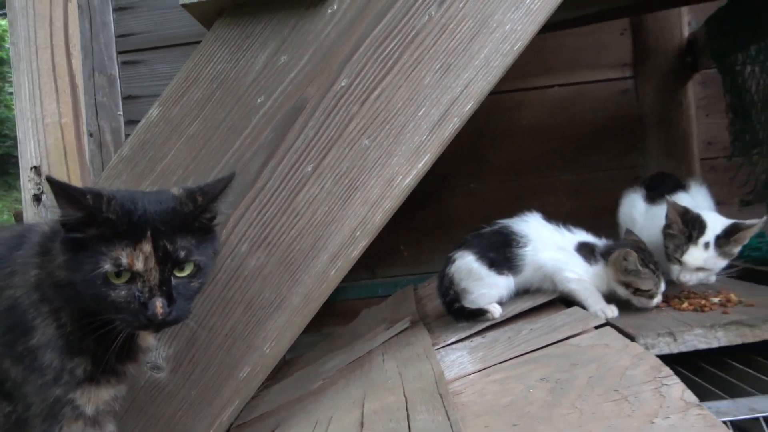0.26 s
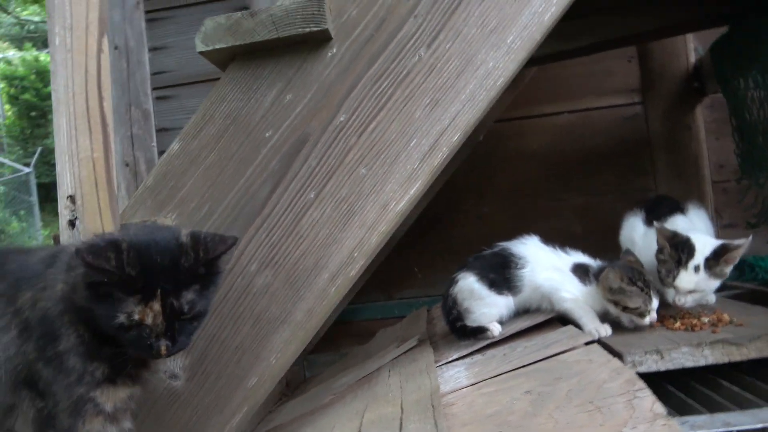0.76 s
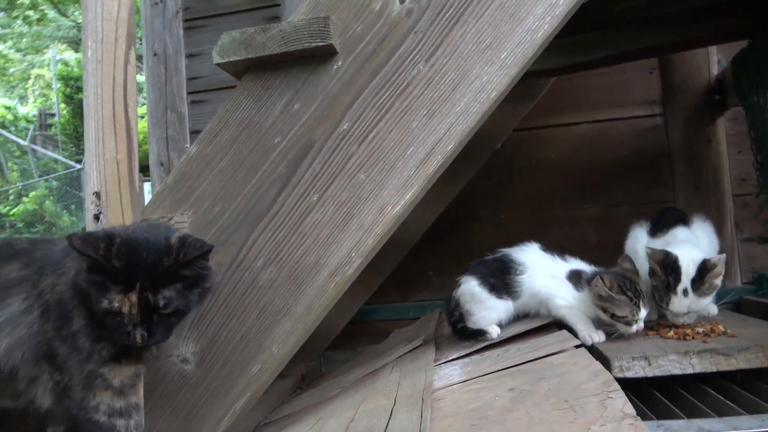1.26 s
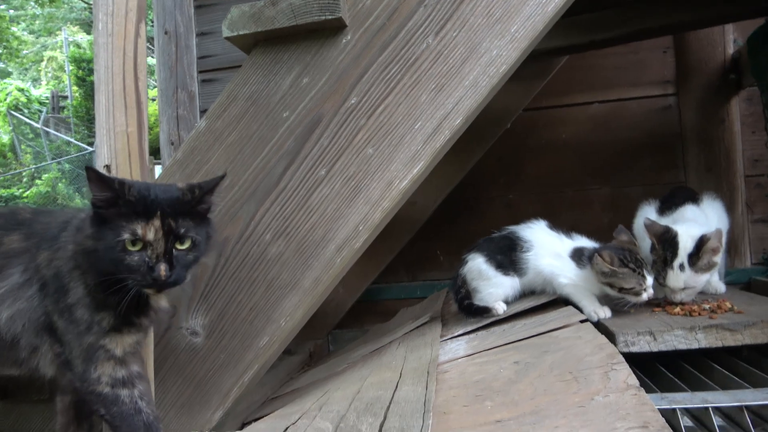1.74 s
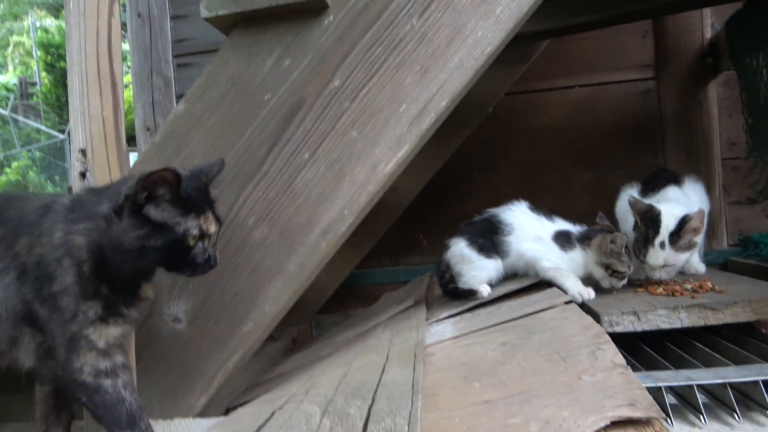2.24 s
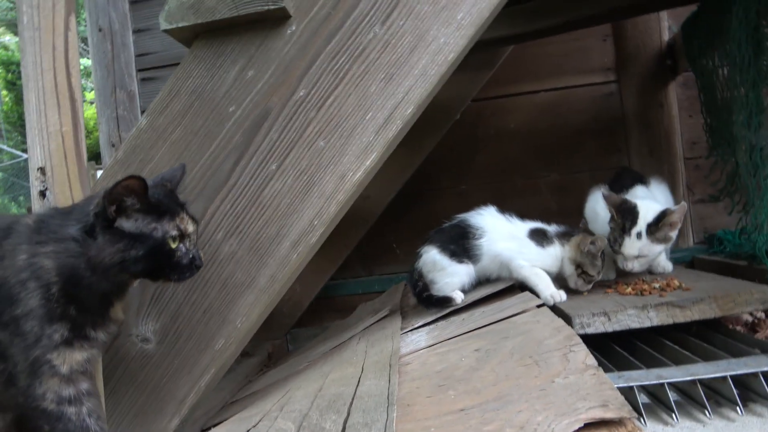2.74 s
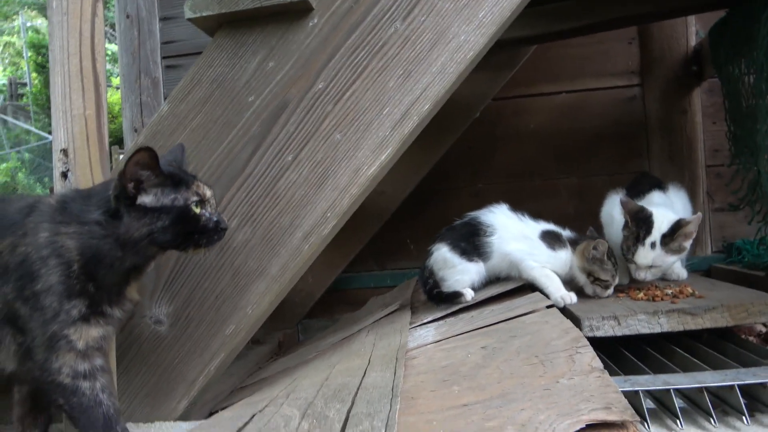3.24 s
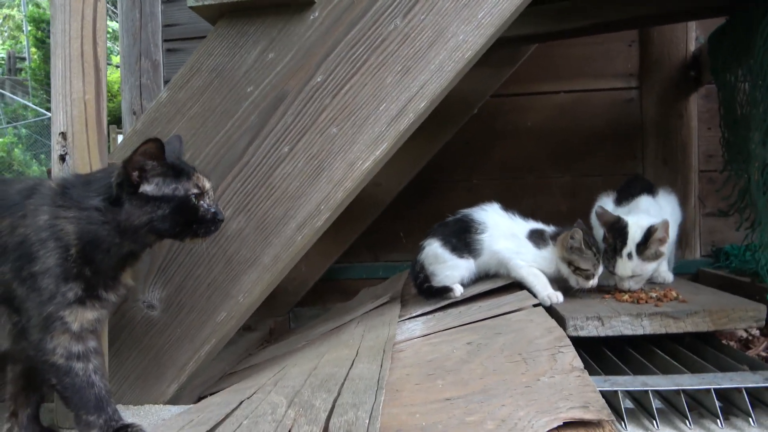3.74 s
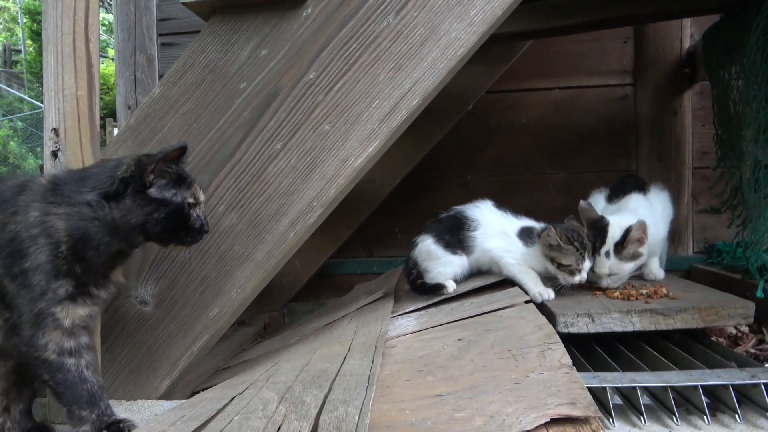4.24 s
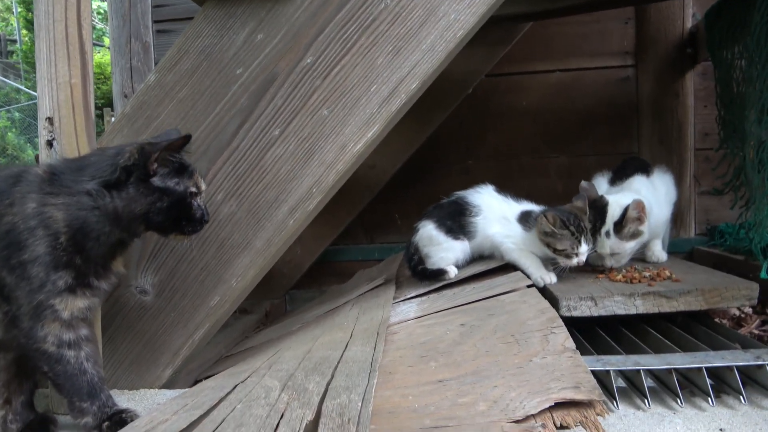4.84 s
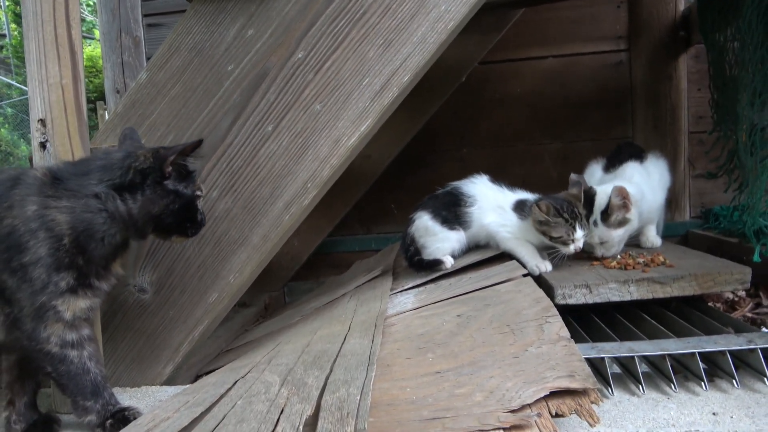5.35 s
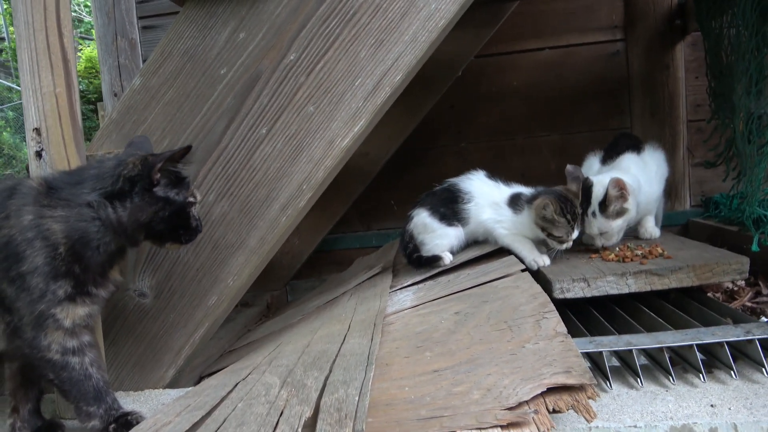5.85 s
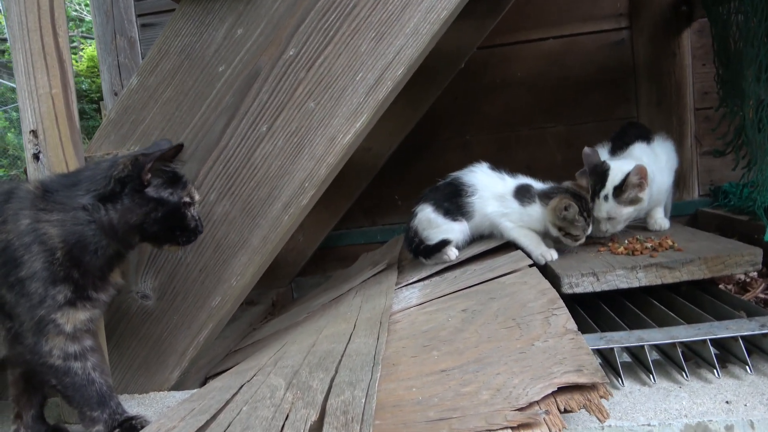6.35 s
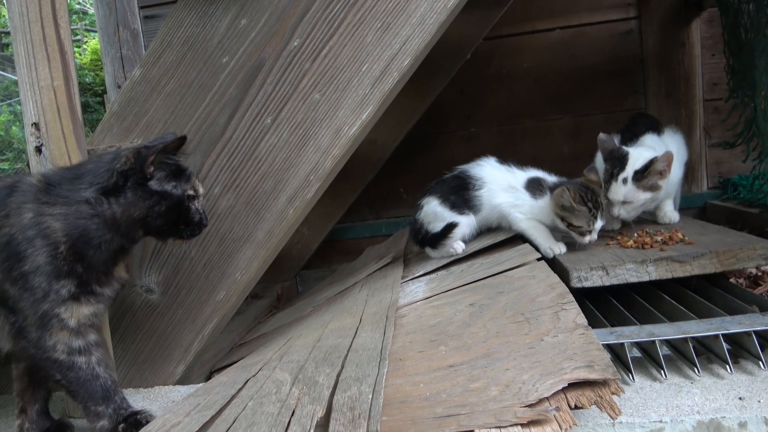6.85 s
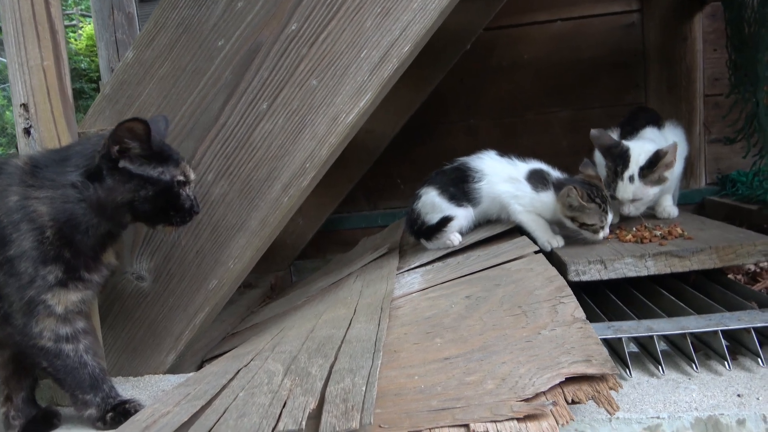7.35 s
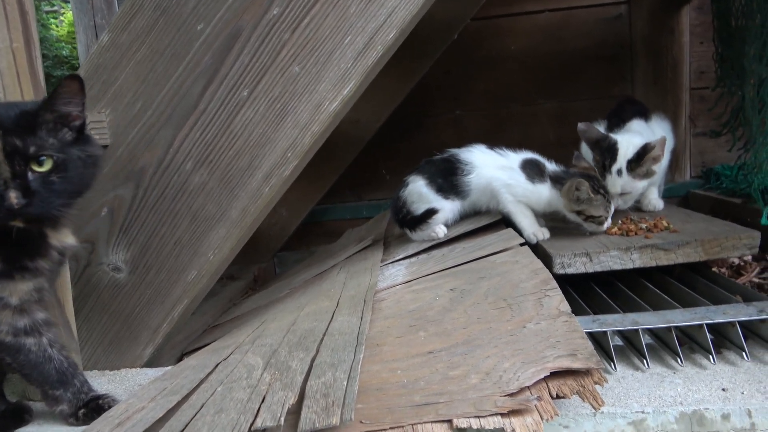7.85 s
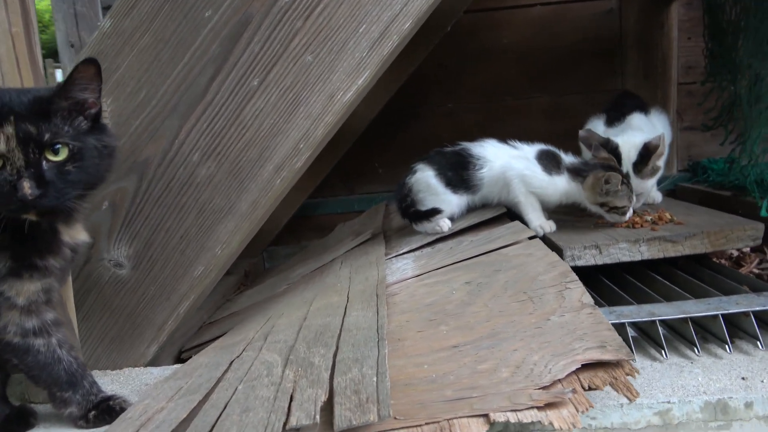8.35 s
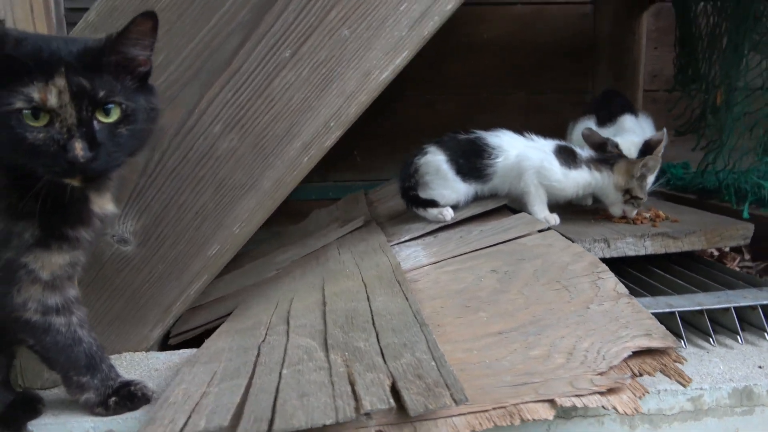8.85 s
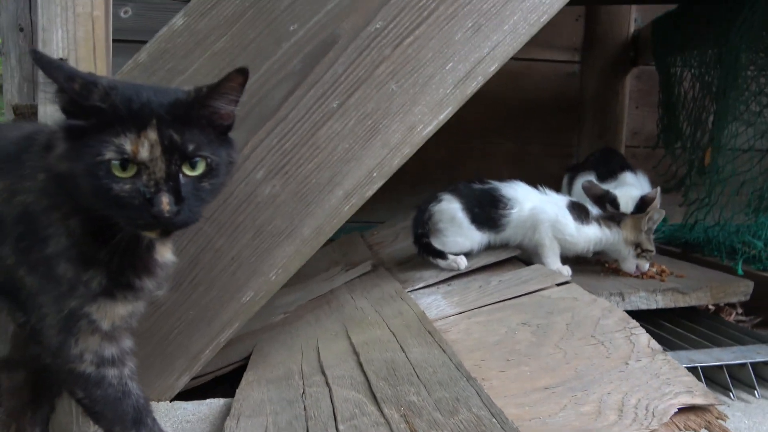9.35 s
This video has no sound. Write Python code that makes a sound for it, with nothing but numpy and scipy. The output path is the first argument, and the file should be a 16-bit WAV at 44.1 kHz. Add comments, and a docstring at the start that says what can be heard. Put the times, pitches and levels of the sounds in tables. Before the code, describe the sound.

Loud, shrill summer cicadas pulse rapidly over a steady distant insect chorus while cats crunch dry food on wooden boards, with occasional soft paw thumps.

```python
"""Summer cicadas around a wooden shelter

Close by, a singer's pitch swings up and down about fourteen times a second; a neighbour half a swing out of
step at times fills its gaps, and a buzzer holds one note: buckling tymbals ring damped modes. Far off, a chorus
of echoed click trains and shaped noise shimmers. Dry food cracks on the boards and rings their modes, paws
thump in low pushes, and a hum and low airy noise lie below. A band-limited stereo microphone hears it all."""
import sys
import numpy as np
from scipy import signal
from scipy.fft import rfft, irfft, next_fast_len
from scipy.io import wavfile
from scipy.ndimage import uniform_filter1d, map_coordinates

SR = 44100
rng = np.random.default_rng(int(sys.argv[2]) if len(sys.argv) > 2 else 0)


def unload_audio(sound):
    """Save the sound as a 16-bit wav file, at the path given as the first command line argument."""
    columns = np.transpose(np.atleast_2d(sound))
    # keep every value between -1 and 1, then stretch to whole-number steps
    steps = np.round(np.clip(columns, -1, 1) * 32767)
    wavfile.write(sys.argv[1], SR, steps.astype(np.int16))


def natural_amplitude(level_db):
    """Convert a level in decibels to a linear amplitude factor, elementwise."""
    exponent = np.asarray(level_db, float) / 20
    return 10 ** exponent


N = 423360  # samples, 9.6 s

# Near singer's pace, held until the next row: [t/s, abdomen swings per s]
SWING_PACE = [(0, 13.91), (1, 13.71), (2.5, 13.82), (5.3, 13.97), (6.9, 14.45), (7.3, 13.85), (7.7, 13.58),
              (9.25, 15)]
# Effort of the near singer: [t/s, low notes 0-1, high notes 0-1]
SINGER_EFFORT = [(0, .72, .75), (1.4, .72, .62), (3.7, .8, .62), (5.2, .62, .52), (7.1, .55, .45),
                 (7.3, .9, .4), (7.8, .88, .6), (9, .78, .72), (9.3, .6, .55)]
# Effort of the neighbour: [t/s, low notes 0-1, high notes 0-1]
NEIGHBOUR_EFFORT = [(0, .1, .1), (4.6, .15, .15), (5.4, .45, .25), (7.15, .48, .4), (7.3, 0, .2),
                    (9.1, .1, 0), (9.3, .52, .3)]
# Modes that ring while the abdomen is low: [f/Hz, level/dB, t60/s]
LOW_MODES = [(5140, -15.5, 0.0097), (5413, -12.5, 0.011), (5920, -15, 0.0087), (6212, -16.5, 0.01)]
# Modes that glide with the abdomen: [low f/Hz, high f/Hz, low level/dB, high level/dB, t60/s]
GLIDING_MODES = [(5836, 8100, -12.5, -15, 0.0068), (6495, 8700, -14, -19, 0.0075),
                 (11310, 15200, -10, -8.5, 0.0048), (12120, 15770, -11.5, -1.5, 0.0054)]
# Modes of the steady buzzer: [f/Hz, level/dB, t60/s]
BUZZER_MODES = [(4946, -28, 0.0078), (7050, -24, 0.0045), (8690, -27.5, 0.0069)]
# What small bodies radiate, with no bass: [f/Hz, level/dB]
BODY_RADIATION = [(3000, -60), (3700, -3), (4600, 3.5), (8700, 2.5), (9800, 3.5), (11200, -2.5)]
# Decay of the scattered echo around the shelter: [f/Hz, t60/s]
YARD_DECAY = [(500, 0.19), (5000, 0.076), (15000, 0.19)]
# The clearest far singers: [buckles per s]
FAR_BUCKLE_RATES = [163, 187, 204]
# Level of the far chorus: [t/s, body level/dB, fizz level/dB]
CHORUS_LEVELS = [(0, -23, -24.5), (5, -25, -26), (6.5, -25.5, -27.5), (7.2, -24.5, -26.5),
                 (9.6, -25.5, -27)]
# Spectral shape of the chorus's lower band: [f/Hz, level/dB per Hz]
BODY_SPECTRUM = [(2060, -51), (3500, -38), (3840, -37), (4230, -13.5), (4990, -3), (6100, 0.5),
                 (8230, -4.5), (9620, -24), (10500, -23), (13600, -19), (22000, -120)]
# Spectral shape of the chorus's upper band: [f/Hz, level/dB per Hz]
FIZZ_SPECTRUM = [(5600, -50), (9300, -16), (10000, -11), (11400, -1), (12400, 0), (13400, -1), (15900, 0)]
# Spectral shape below the chorus: [f/Hz, level/dB per Hz]
UNDERTONE_SPECTRUM = [(1120, -45), (1900, -15), (2270, -7), (2470, 0), (2690, -1), (2940, -1), (3000, -5),
                      (3140, -6), (3180, -9), (3350, -10), (3800, -6), (4940, -36), (8360, -120)]
# Likeness of left and right in the far sounds: [f/Hz, correlation]
STEREO_LIKENESS = [(60, 0.41), (130, 0.39), (290, 0.29), (640, 0.49), (1410, 0.67), (3100, 0.91),
                   (6820, 0.68), (15000, 0.77)]
# A far machine, mean pitch and typical rms: [f/Hz, level/dB]
FAR_MACHINE = (99, -67)
# Spectral shape of the distant air: [f/Hz, level/dB per Hz]
AIR_SPECTRUM = [(13, -36), (22, 5), (103, 4), (202, 1.5), (353, -2.5), (762, -4.5), (823, -8.5),
                (1160, -11), (1560, -13), (1850, -13.5), (2200, -10), (2860, -4.5), (4840, -120)]
# Dry food cracking, before the modes weight it: [t/s, level/dB, strongest f/Hz, snap level/dB over the knock]
FOOD_CLICKS = [(0.131, -30, 955, -6), (0.252, -24.5, 810, -9), (0.395, -23.5, 627, 6),
               (0.492, -28, 754, -10), (0.684, -30, 1770, 1), (0.726, -23, 1210, -2),
               (0.813, -27.5, 775, -10), (0.99, -28.5, 1200, -7), (1.216, -22.5, 660, -11),
               (1.283, -23, 926, -14), (1.324, -32, 1480, -8), (2.15, -29.5, 649, -6),
               (2.487, -30, 1140, -4), (2.525, -24.5, 1110, -8), (2.61, -31, 616, 3),
               (2.646, -27.5, 1670, 4), (4.904, -26.5, 560, 1), (5.216, -32.5, 1320, -5),
               (6.775, -27, 563, -15), (6.809, -22, 714, -13), (6.978, -26.5, 1600, -14),
               (7.094, -29, 641, -12), (7.492, -29, 552, -13), (7.672, -32, 829, -3),
               (8.884, -32.5, 670, -10), (9.297, -23.5, 630, -9), (9.422, -20, 980, -1)]
# Modes of the boards, before they vary from spot to spot: [f/Hz, level/dB, t60/s]
BOARD_MODES = [(752, -4.5, 0.013), (997, -4, 0.0086), (1195, -5, 0.014), (1540, -10.5, 0.02),
               (2290, -2, 0.013)]
# Paws landing, before each push varies: [t/s, level/dB]
PAW_LANDINGS = [(1.217, -35), (1.801, -32), (4.904, -27), (6.809, -21.5), (6.976, -36), (7.492, -32),
                (8.884, -36)]

FIRST_SWING = 0.48  # share of a swing already done at the start
RISE_LAG, FALL_LOSS_DB = 0.031, 5.5  # the rise drags by this share of a swing; the quicker fall sounds weaker
RIB_GAP_S = 0.0007
UNDERTONE_DB, AIR_DB = -51.5, -49.5
CRACK_GAP_S, CRACK_LOSS_DB = 0.004, 4  # typical, from one crack of a click to the next
BOARD_SCATTER = 0.07  # typical share by which the modes shift from spot to spot
DRY_DB, DRY_T60_S = 1, 0.0018  # the dry tick of the break
LEFT_DB, LEFT_PER_SNAP_DB = 0, -0.5  # left over right: dull clicks lie further left than sharp ones
PAW_HZ, PAW_T60_S = 170, 0.01  # first push
SETTLE_S, SETTLE_LOSS_DB = 0.0124, 6.5  # typical, per later push
TOP_HZ = 15750


def unit(x):
    """Scaled to rms 1."""
    return x / np.sqrt(np.mean(x ** 2) + 1e-20)


def along(points, hz):
    """A value read off (f/Hz, value) points on a log frequency axis."""
    f, value = np.transpose(points)
    return np.interp(np.log(hz + 1), np.log(f + 1), value)


def curves(rows, s):
    """The value of each column at the times s."""
    when, *columns = np.transpose(rows)
    return [np.interp(s, when, column) for column in columns]


def filtered(x, response):
    """x shaped by a response given as a function of frequency."""
    size = next_fast_len(N + SR // 2)
    return irfft(rfft(x, size) * response(np.fft.rfftfreq(size, 1 / SR)), size)[..., :N]


def rings(s, hz, gain, t60, size, attack=1e-5):
    """One damped sine for each start time s, summed; each lasts size samples."""
    at = (s * SR).astype(int)[:, None] + 1 + np.arange(size)
    t = at / SR - s[:, None]  # keeps start times finer than a sample
    envelope = gain[:, None] * natural_amplitude(-60 * t / t60) * (1 - np.exp(-t / attack))
    wave = envelope * np.sin(2 * np.pi * hz[:, None] * t)
    return np.bincount(at.ravel(), wave.ravel(), N + SR)[:N]


def buckles(rate_hz, gap, jitter_s, drift_s, scatter_db):
    """Times, sizes and detuning of two tymbals: one buckles gap cycles after the other; the pace drifts."""
    cycle = (np.arange(2500)[:, None] + [0, gap]).ravel()
    chance = rng.standard_normal((cycle.size, 3))
    drift = map_coordinates(rng.standard_normal(80), [cycle / 40])
    s = np.abs(cycle / rate_hz + jitter_s * chance[:, 0] + drift_s * drift)
    keep = s < N / SR
    return s[keep], natural_amplitude(scatter_db * chance[keep, 1]), chance[keep, 2]


def swing(s, effort, behind):
    """How far the abdomen is raised (0-1) at the times s, and the strength of the low and high notes."""
    start, rate = np.transpose(SWING_PACE)
    spent = np.clip(s[:, None] - start, 0, np.diff(start, append=N / SR))  # seconds in each row
    swings = FIRST_SWING - behind + spent @ rate
    turn = 2 * np.pi * (swings - RISE_LAG * np.sin(np.pi * swings) ** 2)
    # The abdomen dwells a little at both ends.
    raised = (1 - np.tanh(1.45 * np.cos(turn)) / np.tanh(1.45)) / 2
    low, high = curves(effort, s)
    return raised, low, high * natural_amplitude(FALL_LOSS_DB * np.minimum(np.sin(turn), 0))


def singer(effort, behind, rate_hz):
    """Tymbal ribs give way in turn, each ringing its mode: deep ones while the abdomen is low, others gliding."""
    s, size, detune = buckles(rate_hz, gap=0.4, jitter_s=0.00003, drift_s=0.001, scatter_db=2)
    up, low, high = swing(s, effort, behind)
    out = np.zeros(N)
    for rib, (hz, db, t60) in enumerate(LOW_MODES):
        gain = natural_amplitude(db) * size * low * (1 - up)
        out += rings(s + rib * RIB_GAP_S, hz * (1 + 0.0067 * detune), gain, t60, size=800, attack=0.00082)
    strength = size * (low + (high - low) * up)
    for rib, (low_hz, high_hz, low_db, high_db, t60) in enumerate(GLIDING_MODES):
        hz = (low_hz + (high_hz - low_hz) * up) * (1 + 0.012 * detune)
        gain = strength * natural_amplitude(low_db + (high_db - low_db) * up)
        out += rings(s + rib * RIB_GAP_S, hz, gain, t60, size=300, attack=0.0005)
    return out


def buzzer():
    """A cicada holds one note, its two tymbals taking nearly even turns to ring fixed modes."""
    s, size, detune = buckles(rate_hz=200, gap=0.47, jitter_s=0.00002, drift_s=0.0005, scatter_db=2.3)
    return sum(rings(s, hz * (1 + 0.033 * detune), natural_amplitude(db) * size, t60, size=300, attack=0.00043)
               for hz, db, t60 in BUZZER_MODES)


def yard(x):
    """Posts, boards and leaves send back a short scattered echo, different at each ear."""
    noise = rng.standard_normal((2, SR // 4))
    hz, t, z = signal.stft(noise, SR, nperseg=256)
    decay = natural_amplitude(-60 * t / along(YARD_DECAY, hz)[:, None])
    tail = signal.istft(z * decay, SR, nperseg=256)[1]
    return signal.fftconvolve(x, tail / np.linalg.norm(tail[0]), axes=1)[:, :N]


def strands(share):
    """Far click trains heard only as echoes smear their beat; this share of the power mixes with noise."""
    echoes = 0
    for rate in FAR_BUCKLE_RATES:
        s, size, _ = buckles(rate, gap=0.45, jitter_s=0.000008, drift_s=0.0007, scatter_db=1.2)
        clicks = np.bincount((s * SR).astype(int), size, N)
        echoes = echoes + yard(clicks[None])
    return np.sqrt(share) * unit(echoes) + np.sqrt(1 - share) * rng.standard_normal((2, N))


def rush(spectrum, patchy_db, source):
    """A two-channel source coloured, given patches of random gain and spread in stereo; rms 1."""
    z = signal.stft(source, nperseg=512)[2]
    across_hz = uniform_filter1d(rng.standard_normal(z.shape[1:]), 3, 0)
    patches = unit(uniform_filter1d(across_hz, 8, 1))
    pair = signal.istft(z * natural_amplitude(patchy_db * patches), nperseg=512)[1][:, :N]

    def mid_side_response(hz):
        angle = np.arccos(np.clip(along(STEREO_LIKENESS, hz), -1, 1)) / 2
        return natural_amplitude(along(spectrum, hz)) * [np.cos(angle), np.sin(angle)]

    mid, side = filtered(pair, mid_side_response)
    return unit(np.array([mid + side, mid - side]))


def chorus():
    """Far singers melt into two shimmering bands; a faint undertone swells with the near singer's deep notes."""
    s = np.arange(N) / SR
    body_db, fizz_db = curves(CHORUS_LEVELS, s)
    up, low, _ = swing(s, SINGER_EFFORT, behind=0)
    far = strands(share=0.45)
    body = natural_amplitude(body_db) * rush(BODY_SPECTRUM, 2.3, far)
    fizz = natural_amplitude(fizz_db) * rush(FIZZ_SPECTRUM, 2.1, far)
    undertone = natural_amplitude(UNDERTONE_DB + 3.5 * low * (0.5 - up)) * rush(UNDERTONE_SPECTRUM, 1.5, far)
    return body + fizz + undertone


def hum():
    """A far machine's faint low sine, its pitch and level wavering slightly together."""
    mean_hz, mean_db = FAR_MACHINE
    waver = map_coordinates(rng.standard_normal(60), [np.arange(N) * 5 / SR])
    phase = 2 * np.pi * np.cumsum(mean_hz + 2.55 * waver) / SR
    return np.sqrt(2) * natural_amplitude(mean_db + 2.6 * waver) * np.sin(phase)


def air():
    """Distant air: patchy noise, strongest in the bass."""
    return natural_amplitude(AIR_DB) * rush(AIR_SPECTRUM, patchy_db=1.9, source=rng.standard_normal((2, N)))


def boards():
    """Each click is three quick cracks ringing most the modes near its pitch, with a dry tick and a snap."""
    # Fainter ticks fall at random among the listed clicks.
    faint = rng.random((110, 3))
    faint_db = -52 - 2.5 * np.log(faint[:, 1])
    faint_hz = 500 + 1200 * faint[:, 2]
    ticks = np.c_[faint[:, 0] * N / SR, faint_db, faint_hz, np.full(len(faint), -9)]
    s, db, pitch_hz, snap_db = np.r_[FOOD_CLICKS, ticks].T
    # Click, mode (the last row serves the crack itself), crack, kind of variation.
    spread = rng.standard_normal((len(s), len(BOARD_MODES) + 1, 3, 3))
    out = np.zeros((2, N))
    for side, sign in enumerate((1, -1)):
        level_db = db + sign * (LEFT_DB + LEFT_PER_SNAP_DB * snap_db) / 2
        for crack in range(3):
            late, snap_shift, louder = spread[:, -1, crack].T
            when = s + crack * CRACK_GAP_S * (1 + 0.5 * np.tanh(late))
            crack_db = level_db - CRACK_LOSS_DB * crack + 1.3 * louder
            for k, (hz, mode_db, t60) in enumerate(BOARD_MODES):
                near_db = -12 * np.abs(np.log2(hz / pitch_hz)) + 2.5 * spread[:, k, crack, 0]
                mode_hz = hz * (1 + BOARD_SCATTER * spread[:, k, 0, 1])
                gain = natural_amplitude(crack_db + mode_db + near_db)
                out[side] += rings(when, mode_hz, gain, t60, size=900, attack=0.00084)
            out[side] += rings(when, 1.5 * pitch_hz, natural_amplitude(crack_db + DRY_DB), DRY_T60_S, size=200)
            snap_hz = 2800 * (1 + 0.2 * snap_shift)
            out[side] += rings(when, snap_hz, natural_amplitude(crack_db + snap_db), 0.003, size=400, attack=0.0001)
    return out


def paws():
    """A paw gives one low push, then mostly softer, deeper ones as the weight settles; the sides differ."""
    s, db = np.transpose(PAW_LANDINGS)
    chance = rng.random((len(s), 5, 3))
    out = np.zeros((2, N))
    for side in range(2):
        for k in range(5):
            when = s + k * SETTLE_S * (0.5 + chance[:, k, 0])
            hz = np.full(len(s), PAW_HZ * 0.84 ** k)
            push_db = db - SETTLE_LOSS_DB * k + 13 * (chance[:, k, side + 1] - 0.5)
            out[side] -= rings(when, hz, natural_amplitude(push_db), PAW_T60_S * (1 + k), size=2000)
    return out


def scene():
    """Near sources with their echo, over the far chorus, the hum and the air."""
    near_singer = singer(SINGER_EFFORT, behind=0, rate_hz=170.5)
    neighbour = singer(NEIGHBOUR_EFFORT, behind=0.5, rate_hz=176)
    cicadas = filtered(near_singer + neighbour + buzzer(), lambda hz: natural_amplitude(along(BODY_RADIATION, hz)))
    far = chorus() + hum() + air()
    # Both groups lean slightly left, by dB per side.
    near = cicadas * natural_amplitude([[0.2], [-0.2]]) + boards() + paws()
    return near + natural_amplitude(-10.5) * yard(near) + far * natural_amplitude([[0.4], [-0.4]])


def band_limit(x):
    """A steep low-pass at the top of the band."""
    return signal.sosfilt(signal.butter(12, 17100, fs=SR, output="sos"), x)


def record(dry):
    """The microphone keeps nothing above its band limit and thins the deepest bass."""
    mix = filtered(dry, lambda hz: (hz < TOP_HZ) * hz / (hz + 40))
    return band_limit(mix)


dry = scene()
out = record(dry)
unload_audio(out)
```